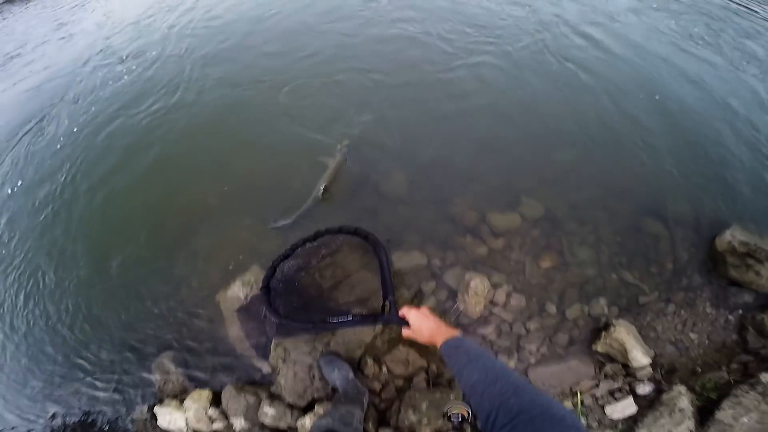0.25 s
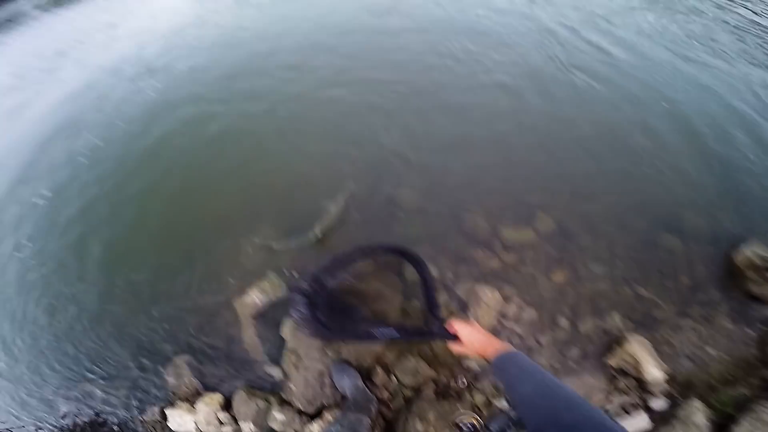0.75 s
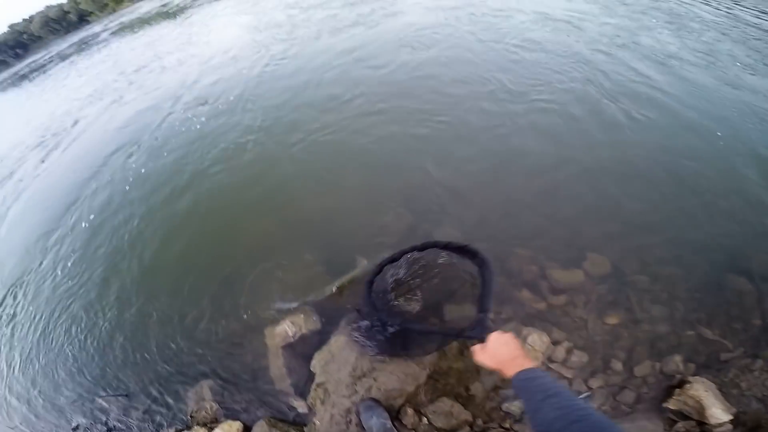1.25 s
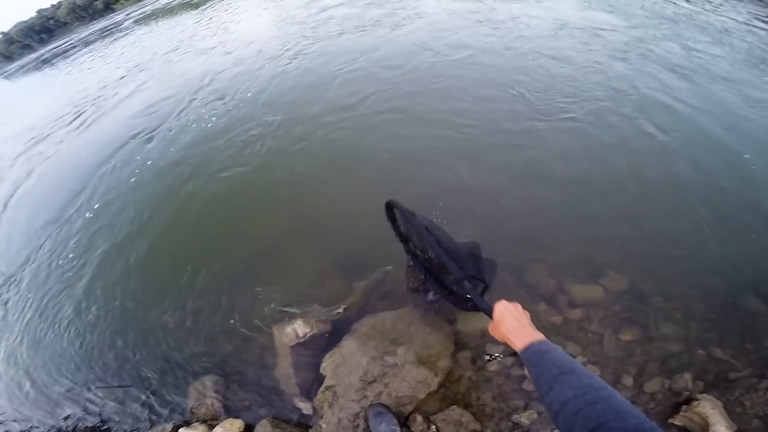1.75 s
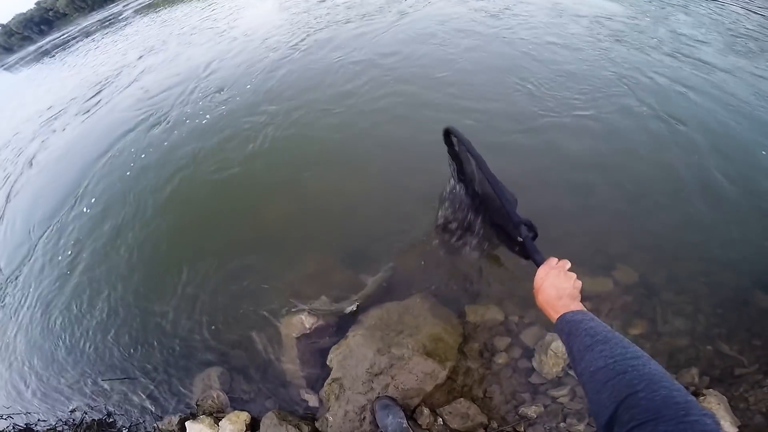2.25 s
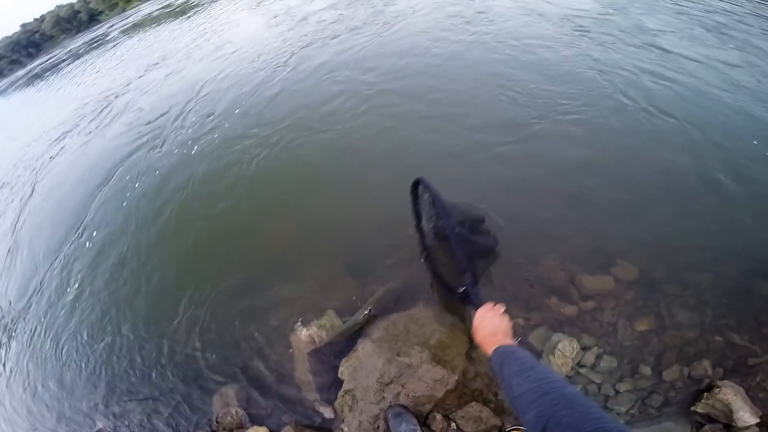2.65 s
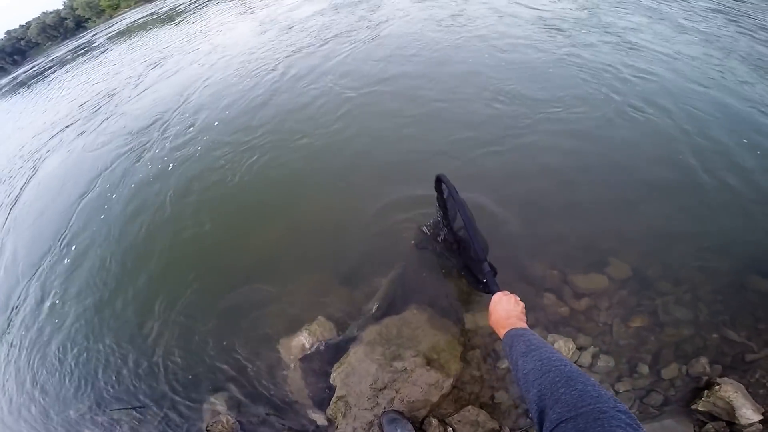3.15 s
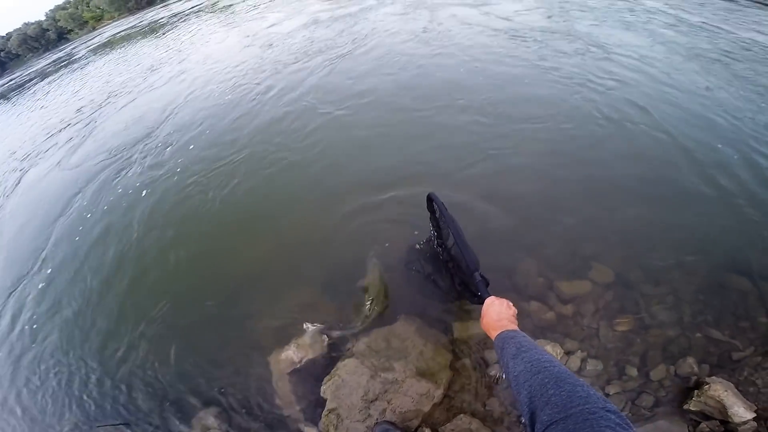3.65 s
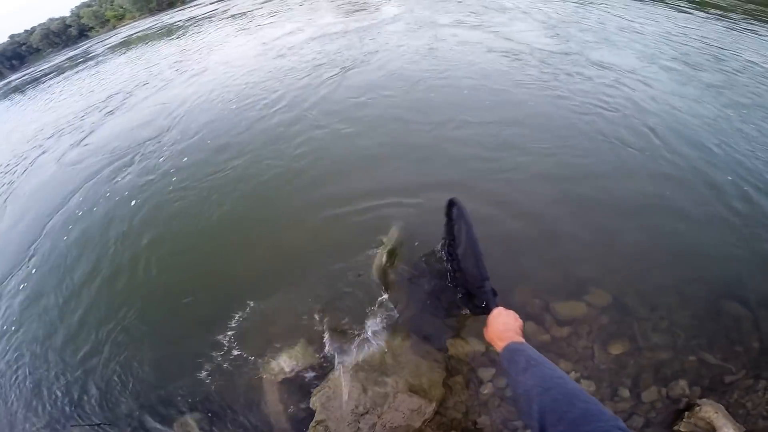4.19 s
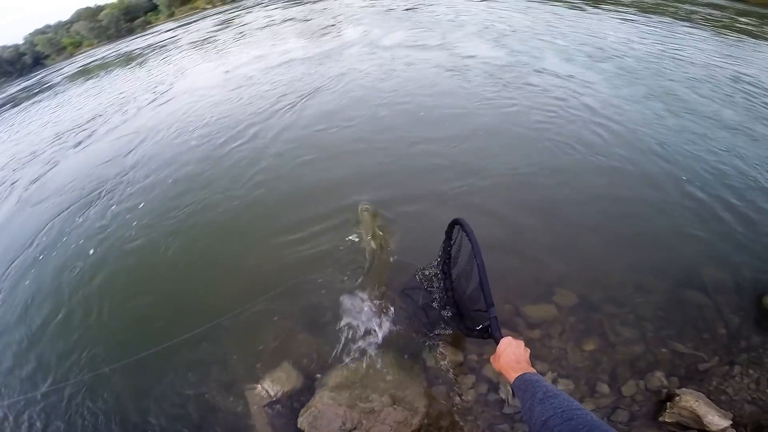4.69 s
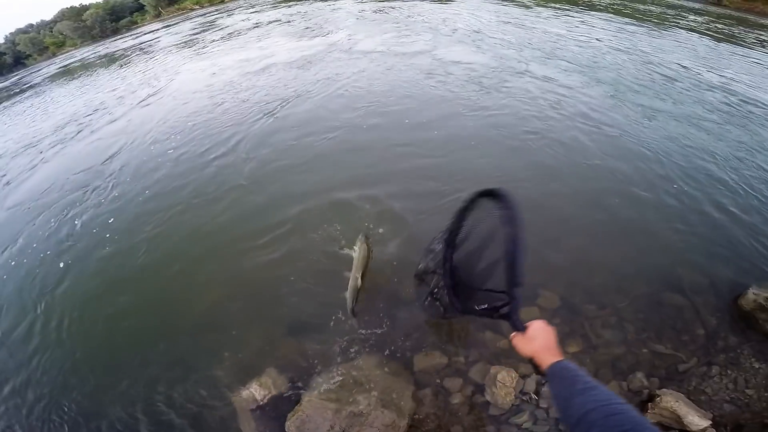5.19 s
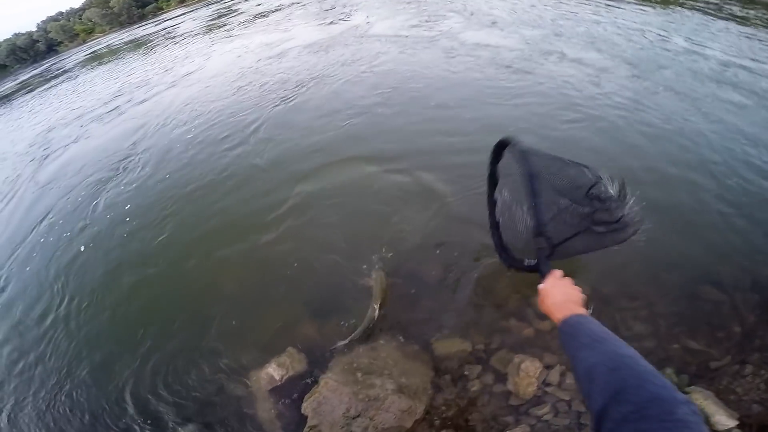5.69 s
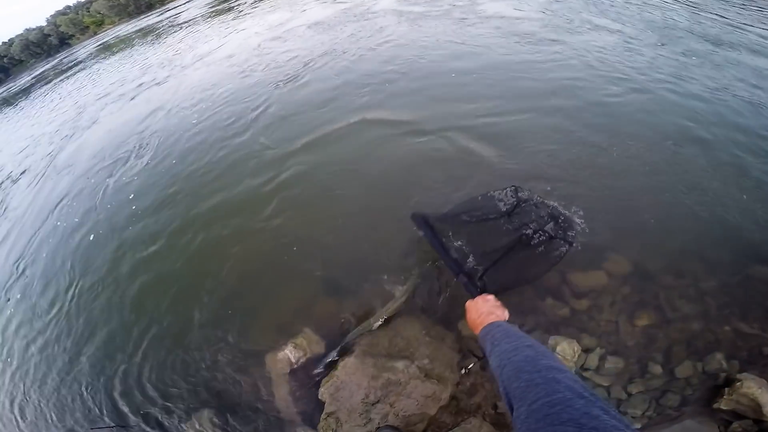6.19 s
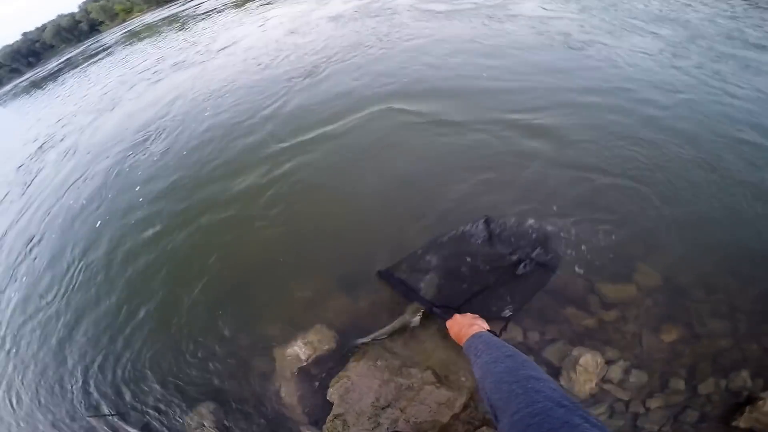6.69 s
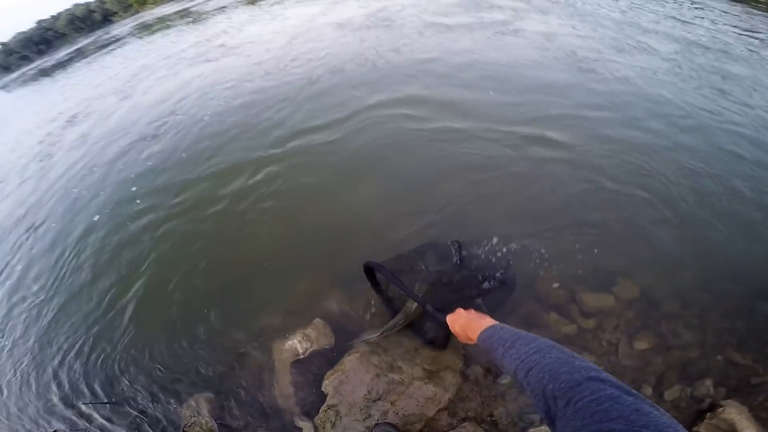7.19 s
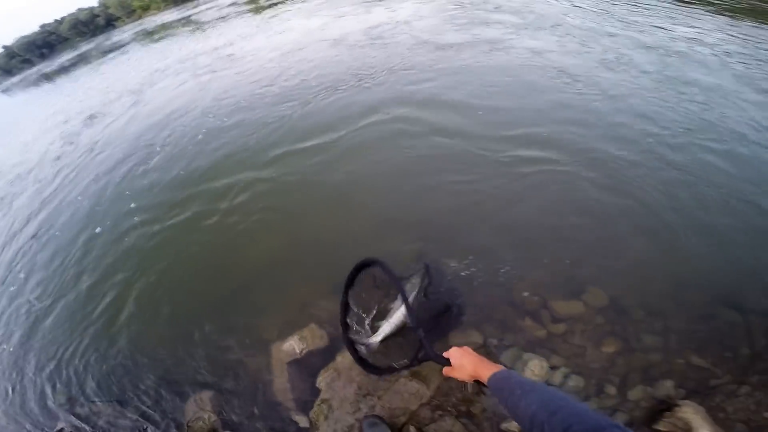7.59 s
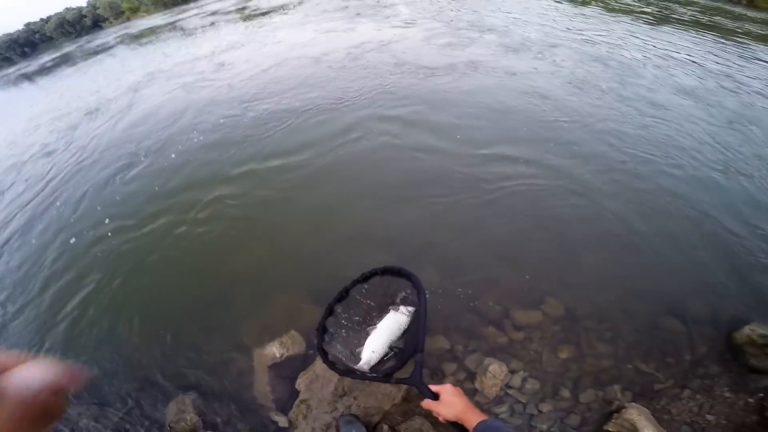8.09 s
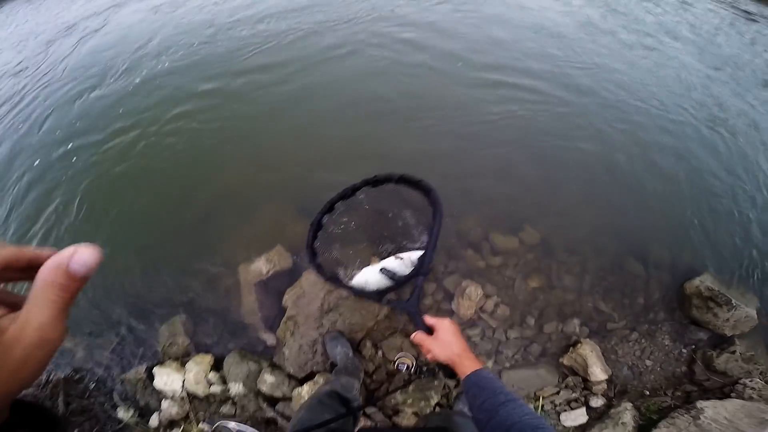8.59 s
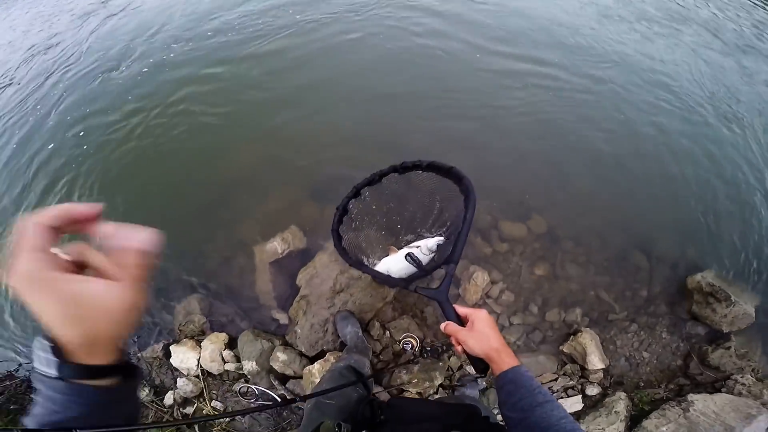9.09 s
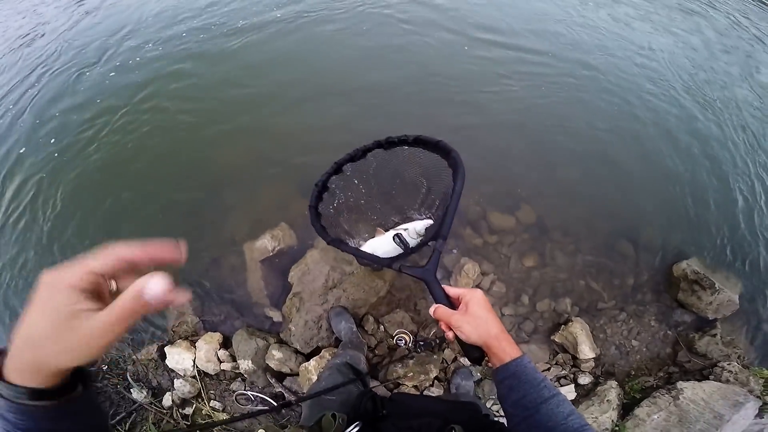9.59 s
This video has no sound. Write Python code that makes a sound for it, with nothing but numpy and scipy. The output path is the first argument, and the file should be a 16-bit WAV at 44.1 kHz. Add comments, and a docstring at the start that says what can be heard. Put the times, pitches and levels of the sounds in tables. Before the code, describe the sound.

On a quiet river bank, low wind rumbles on a head-worn camera microphone over a soft wash of current. A stone knocks with a dull thud, small pebbles tick and water sloshes gently. A fish then thrashes in bright, gulping splashes. After a pause the net makes a smaller splash, sweeps softly through the water and lifts, dripping sparsely while a distant bird whistles.

```python
"""On a river bank an angler nets a small fish from the stones, heard from a camera on the head.
A knock on the stones, the fish thrashes in the shallows, the net sweeps the water and is lifted, dripping.
Water sounds are built from ringing bubbles and shaped noise, stones from noise through resonances.
Air rumbles on the microphone and the river washes by as shaped noise; a songbird's gliding tones come from far off.
"""
import sys
import numpy as np
from scipy import signal
from scipy.fft import rfft, irfft
from scipy.io import wavfile
from scipy.ndimage import uniform_filter1d

SR = 44100
rng = np.random.default_rng(int(sys.argv[2]) if len(sys.argv) > 2 else 0)


def master_out(mix):
    """Clip the mix to full scale and print it as 16-bit PCM to the path in sys.argv[1]."""
    frames = np.transpose(np.atleast_2d(mix))
    ceiling = np.clip(frames, -1, 1)
    pcm = np.round(ceiling * 32767).astype(np.int16)
    wavfile.write(sys.argv[1], SR, pcm)


N = 434385
TIME = np.arange(N) / SR


def gain_of(db):
    """Logarithmic level: decibels to amplitude ratio."""
    return 10 ** (np.asarray(db) / 20)


def evened(x):
    """Normalisation: scales to unit rms."""
    return x / np.sqrt(np.mean(x ** 2) + 1e-20)


def add(mix, s, sound):
    """Superposition: mixes a sound in at time s, in place."""
    part = mix[max(round(s * SR), 0):][:len(sound)]
    part += sound[:len(part)]


def coloured(x, points):
    """Spectral shaping: filters x through (f/Hz, level/dB) points, then scales to unit rms."""
    hz, db = np.transpose(points)
    f = np.fft.rfftfreq(len(x), 1 / SR)
    gain = gain_of(np.interp(np.log(f + 1), np.log(hz + 1), db))
    return evened(irfft(rfft(x) * gain, len(x)))


def wander(size):
    """Low-pass noise: a random curve of unit rms, changing over about size samples."""
    smooth = uniform_filter1d(rng.standard_normal(N), size)
    return evened(uniform_filter1d(smooth, size))


def dying(t, rise, t60):
    """Damping: a soft start and an exponential decay, peaking at one."""
    shape = (1 - np.exp(-(t / rise) ** 2)) * gain_of(-60 * t / max(t60, .005))
    return shape / shape.max()


def droplets(per_s, size_db, low_hz, high_hz, cycles=7, count=24):
    """Bubble resonance: a random shower of short rings, each rising slightly in pitch, at unit rms."""
    out = np.zeros(N)
    for hz in np.geomspace(low_hz, high_hz, count):
        turns = np.arange(int(3 * cycles * SR / hz) + 2) * hz / SR
        tone = np.sin(2 * np.pi * turns * (1 + 0.032 * turns / cycles))
        ring = tone * np.exp(-2 * turns / cycles) * np.sqrt(hz)
        at = np.flatnonzero(rng.random(N) < per_s / count / SR)
        sizes = gain_of(size_db * np.minimum(rng.exponential(1, 8000), 4))
        rings = np.resize(sizes, len(at))[:, None] * ring
        where = (at[:, None] + np.arange(len(ring))) % N
        out += np.bincount(where.ravel(), rings.ravel(), N)
    return evened(out)


def bursts(rows, spectrum, t60, level_db, swell, grain, crack, lag=0.0016):
    """Transient noise: each grainy burst swells, cracks and decays with its own spectral tilt."""
    out, t = np.zeros(N), np.arange(-600, 3496) / SR
    swell_and_decay = np.exp(np.minimum(t, 0) / swell) * gain_of(-60 * np.maximum(t, 0) / t60)
    shape = swell_and_decay * (1 + crack * np.exp(-(t / 0.00054) ** 2))
    for s, db, brightness in rows:
        grains = rng.standard_normal(len(t)) * np.exp(grain * rng.standard_normal(len(t)))
        body = coloured(grains, [(hz, level + brightness * np.log2(hz)) for hz, level in spectrum])
        add(out, s + lag + t[0], gain_of(db + level_db) * body * shape)
    return out


def scattered(x, t60, wet_db):
    """Diffuse reflection: adds an echo of decaying noise, as from stones or trees."""
    t = np.arange(SR // 2) / SR
    tail = rng.standard_normal(len(t)) * dying(t, 0.0039, t60)
    return x + gain_of(wet_db) * signal.oaconvolve(x, tail / np.linalg.norm(tail))[:N]


# water thrown up, first by the fish's tail, then by the net:
# t/s, length/s, spray level/dB, churn level/dB, t60/s of the falling back
SURGES = [(3.805, 0.077, -66.5, -70, .5), (3.887, 0.12, -65, -71.5, 0.66), (4.113, 0.052, -61, -67.5, 0.34),
          (4.205, 0.061, -64.5, -61.5, 0.67), (4.283, 0.17, -59.5, -64.5, 0.54),
          (4.501, 0.051, -62.5, -65, .6), (4.572, 0.031, -56.5, -64.5, .7), (4.641, 0.074, -59, -71, 0.99),
          (4.785, 0.044, -63.5, -69, 0.83), (5.987, 0.042, -64, -70, .6), (6.015, 0.066, -62, -74, 0.45),
          (6.123, 0.018, -66.5, -70, 0.5), (6.21, 0.04, -68.5, -74, 0.78), (6.347, 0.06, -68, -69, 0.27),
          (6.427, .035, -71, -69.5, .6)]
# spectrum of the falling spray: f/Hz, level/dB per Hz
SPRAY = [(900, -2.5), (1800, -11), (2600, -5), (4000, 2.5), (5200, -5.5), (6500, -9.5), (8200, -4.5),
         (10500, -12), (14500, -7)]
# spectrum of the larger bubbles below: f/Hz, level/dB per Hz
CHURN = [(100, -25), (300, 2), (600, 10.5), (950, 12.5), (1600, 16), (2300, -5.5), (4000, -23)]
SURGE_RISE_S = 0.011  # half the rise, centred on the surge's listed time
TINKLE_SHARE, MIST_SHARE = .45, .21  # long rings and smooth noise, as amplitudes beside the drops


def splash(clump_db=2, fizz_db=-15):
    """Bubble acoustics: thrown water falls back as clumped spray and fizz over churning bubbles."""
    s, length, spray_db, churn_db, t60 = np.transpose(SURGES)[:, :, None]
    age = TIME - s
    rise = np.clip(.5 + .5 * age / SURGE_RISE_S, 0, 1)
    surge = rise * gain_of(-60 * np.clip(age - length, 0, 2) / t60)

    drops = droplets(2700, 3.2, 1300, 15000, cycles=10, count=40)
    tinkle = droplets(800, 2.3, 1900, 6000, cycles=24, count=40)
    gurgle = droplets(750, 3.3, 300, 2600, cycles=9, count=36)
    spray = coloured(drops + TINKLE_SHARE * tinkle + MIST_SHARE * rng.standard_normal(N), SPRAY)
    spray = spray + gain_of(fizz_db) * droplets(220, 7.5, 6900, 14000, cycles=2.5)
    churn = coloured(gurgle + MIST_SHARE * rng.standard_normal(N), CHURN)

    out = np.zeros(N)
    for water, db in [(spray, spray_db), (churn, churn_db)]:
        strongest = (surge * gain_of(db)).max(0)  # overlapping surges do not add up
        out += water * strongest * gain_of(clump_db * wander(size=300))
    return out


# slaps on the water and fine, bright pops of fizz:
# t/s, level/dB before the common trim, brightness/dB per octave
SLAPS_AND_POPS = [(3.806, -57.5, 8), (3.899, -52, 1.5), (3.926, -50.5, 6), (3.968, -51, 2),
                  (4.068, -55.5, 10), (4.128, -57, 3), (4.291, -48, -1), (4.322, -52, -2), (4.357, -56, -1),
                  (4.386, -54, 10), (4.433, -53.5, 3), (4.505, -66, -2), (4.601, -54, 4), (4.659, -59, -1),
                  (4.799, -56, 3), (6.033, -58, 12), (6.062, -58, -3), (6.128, -60, -1), (6.187, -63, 11),
                  (6.212, -49, -7.5), (6.213, -60, 13), (6.279, -51, -2.5), (6.31, -59.5, 1.5),
                  (6.365, -57, 4), (6.407, -70, 9), (6.455, -60, 2), (6.476, -60, 11), (6.553, -62, 2)]
# spectrum of a slap or pop before its tilt, also of a heavy drop: f/Hz, level/dB per Hz
SURFACE_BURST = [(300, 4), (900, 5), (2000, 2), (3500, 2), (6000, -3.5), (10000, -11.5), (15000, -18)]


def slaps_and_pops():
    """Transient noise: slaps on the water and fine, bright pops of fizz, as short bursts of noise."""
    return bursts(SLAPS_AND_POPS, SURFACE_BURST, t60=0.025, level_db=1.0,
                  swell=0.0015, grain=0.37, crack=0.076)


SPATTER_PER_S, SPATTER_DB = 30, -12  # heavy drops in a surge, mean dB over its spray


def spatter(spread_db=4, tilt_db=2):
    """Random impacts: heavy drops land as soft bursts at chance moments within each surge."""
    rows = []
    for start, length, spray_db, _, _ in SURGES:
        for when, force, colour in rng.random((round(SPATTER_PER_S * length), 3)):
            db = spray_db + spread_db * (2 * force - 1)
            rows.append((start + when * length, db, tilt_db * (2 * colour - 1)))
    return bursts(rows, SURFACE_BURST, t60=0.045, level_db=SPATTER_DB, swell=0.0032, grain=0.27, crack=0.1)


RING_T60, RING_HZ, RING_DB = 0.073, 1000, -53.5  # s that a bubble of this pitch and level rings
RING_PITCH_POWER, RING_HALVING_DB = 1, 15


def ring_time(hz, db):
    """Bubble damping: large, gently trapped bubbles ring longest."""
    return RING_T60 * (RING_HZ / hz) ** RING_PITCH_POWER * 2 ** ((RING_DB - db) / RING_HALVING_DB)


def bubble(hz, t60, glide, onset_cycles=0.83, wobble=0.044, swell_share=0.042):
    """Volume resonance: a trapped air pocket rings, its pitch bending as it nears the surface."""
    t = np.arange(5000) / SR
    unrest = evened(uniform_filter1d(rng.standard_normal(len(t)), 90))
    octaves = np.clip(glide * t, -2, 2)
    pitch = hz * 2 ** octaves * (1 + wobble * unrest)
    alive = np.exp(-(octaves / 1.45) ** 8)  # silenced once bent by about 1.45 octaves
    swell = swell_share * min(t60, RING_T60) * np.tanh(max(glide, 0) / 10)  # rising gulps open softly
    envelope = dying(t, onset_cycles / hz + swell, t60) * alive
    return np.sin(2 * np.pi * np.cumsum(pitch) / SR) * envelope


# large air pockets closing in the water:
# t/s, level/dB (before the common trim), f/Hz, glide/octaves per s
BUBBLES = [(2.771, -58, 846, 18), (2.812, -56, 840, 5), (2.829, -58, 1050, 36), (3.633, -56, 1600, -3),
           (3.645, -52, 1480, -21), (3.674, -64, 717, -1), (3.759, -54, 1480, 0), (3.761, -56, 903, 16),
           (3.813, -55, 1260, 31), (3.831, -59, 1000, 9), (3.84, -58, 1450, 17), (3.869, -59, 924, 9),
           (3.873, -60, 1600, -5), (3.882, -53, 1006, -1), (3.884, -49, 1330, -4), (3.898, -39, 3100, -5),
           (3.901, -62, 1280, 12), (3.921, -50, 1620, 2), (3.972, -42.5, 1180, -19),
           (3.992, -55, 900, -6.5), (4.051, -48.5, 844, -2.5), (4.104, -65, 655, 6), (4.112, -67, 1060, 8),
           (4.126, -59, 813, -5), (4.142, -46.5, 997, 0), (4.16, -54, 2450, -6), (4.163, -57, 720, -12.5),
           (4.173, -54, 450, -2.5), (4.212, -37.5, 158, 41.5), (4.238, -56, 904, 11),
           (4.281, -47, 1145, -14), (4.303, -55, 1046, 14), (4.314, -56, 782, 18.5), (4.336, -55, 386, 6.5),
           (4.385, -54, 323, -1), (4.362, -54, 2300, 3), (4.418, -52, 977, -11), (4.434, -43.5, 940, -9),
           (4.505, -51, 2244, 9), (4.52, -49, 1510, -25), (4.536, -37, 1014, -17), (4.541, -48, 1580, 2),
           (4.727, -55, 464, -0.5), (4.784, -60, 930, -8.5), (4.849, -57, 1600, 4), (4.93, -54.5, 281, 4),
           (4.932, -60.5, 647, 19.5), (4.97, -55, 868, 17), (5.036, -58, 817, 23), (5.067, -56, 987, -10),
           (5.069, -63, 1350, 0), (6.032, -60, 1240, 5), (6.064, -71, 884, 5), (6.081, -60, 1250, -2),
           (6.083, -45, 2600, -2), (6.132, -59, 1110, -8), (6.28, -57, 1194, -16), (6.315, -57, 224.5, -3),
           (6.35, -56, 2310, -1), (6.372, -62, 1010, 14), (6.384, -53, 2900, 10), (6.386, -56, 1500, 12),
           (6.392, -54, 1510, -6), (6.397, -65, 817, 5), (6.437, -60, 700, 15), (6.507, -57, 1516, -9),
           (7.51, -56, 1550, 2), (8.331, -56.5, 927, 6), (9.069, -56.5, 990, 0.5)]
STRAY_PER_S, STRAY_LAG_S = 49, .05  # lesser bubbles in a surge and just after it
STRAY_DB, STRAY_LOW_HZ, STRAY_HIGH_HZ = 4.5, 709, 2354  # loudest stray, dB over the surge's churn


def plops(level_db=-1, stray_rise=9, spread_db=3):
    """Bubble resonance: gulps around fish and net, and lesser bubbles stirred up by every surge."""
    out = np.zeros(N)
    for s, db, hz, glide in BUBBLES:
        add(out, s, gain_of(db + level_db) * bubble(hz, ring_time(hz, db), glide))
    for start, length, _, churn_db, _ in SURGES:
        span = length + STRAY_LAG_S
        for when, size, force, bend in rng.random((round(STRAY_PER_S * span), 4)):
            hz = STRAY_LOW_HZ * (STRAY_HIGH_HZ / STRAY_LOW_HZ) ** size
            db = churn_db + STRAY_DB - 2 * spread_db * force
            stray = bubble(hz, ring_time(hz, RING_DB), 2 * bend * stray_rise)
            add(out, start + when * span, gain_of(db) * stray)
    return out


# drips from the mesh and the fish's tail: t/s, level/dB at the peak, f/Hz
DRIPS = [(1.352, -59, 4020), (1.46, -61, 3880), (1.558, -65, 4380), (1.722, -61, 2350),
         (2.378, -55.5, 3800), (2.8095, -56, 2560), (3.612, -54.5, 5220), (3.679, -51, 4080),
         (3.927, -42.5, 3820), (3.998, -48, 3900), (4.292, -43, 4250), (4.572, -48.5, 3540),
         (6.083, -53, 4050), (6.128, -52, 3650), (6.223, -50, 4050), (6.239, -61, 3930), (6.398, -55, 4200),
         (6.8518, -58, 4740), (7.4939, -49.5, 4200), (7.5318, -55.5, 3700), (7.5762, -55, 3820),
         (7.5981, -54.5, 3930), (7.841, -58, 4270), (7.915, -62, 3950), (8.2962, -55, 4050),
         (9.122, -59, 4100), (9.335, -59, 4050), (9.682, -57.5, 4020)]
DRAIN_DB, DRAIN_HZ = -72, 4100  # mean of the faint drips while the lifted net drains


def drips(t60=0.019, spread_db=2, spread_hz=300, count=5):
    """Bubble resonance: small falling drops each set off a short, high ring."""
    out = np.zeros(N)
    times = rng.uniform(7.2, 9.8, count)  # s, while the net drains
    levels = rng.normal(DRAIN_DB, spread_db, count)
    pitches = rng.normal(DRAIN_HZ, spread_hz, count)
    for s, db, hz in [*DRIPS, *zip(times, levels, pitches)]:
        add(out, s, gain_of(db) * bubble(hz, t60, 0.87, onset_cycles=1.0, wobble=0.037))
    return out


# the net stirs the shallows gently: middle t/s, half length/s, level/dB
STIRS = [(2.675, 0.39, -67.5), (7.148, 0.63, -68)]
# spectrum of the stirred water: f/Hz, level/dB per Hz
SLOSH = [(120, -4), (280, 6), (500, -7.5), (950, -2), (1500, -8), (2500, -9.5), (5000, -18)]


def stir(bubbly=0.49):
    """Flow noise: water washes softly through the moving mesh, as noise mixed with small rings."""
    bubbles = droplets(200, 3.2, 296.0, 1785, cycles=6.4)
    water = coloured(rng.standard_normal(N) + bubbly * bubbles, SLOSH)
    return water * sum(gain_of(db) * np.exp(-((TIME - s) / half) ** 2) for s, half, db in STIRS)


# a stone tips and lands: t/s, clack level/dB, thud level/dB, t60/s
KNOCKS = [(2.4654, -47.5, -50, 0.045), (2.472, -48.5, -59, 0.022), (2.4878, -52, -42.5, 0.033),
          (2.497, -56, -48, 0.047), (2.515, -62, -60, 0.069), (2.549, -64, -57, .05)]
# resonances of the stone: f/Hz, width/Hz, level/dB
STONE = [(930, 220, -5), (2340, 210, -6), (3100, 210, 3), (3400, 270, 3), (4200, 210, 0), (5330, 310, -10),
         (6740, 460, -7), (7300, 340, -9)]
# spectrum of its weight landing: f/Hz, level/dB per Hz
THUD = [(80, -15), (170, -7), (300, 10), (600, -4.5), (1000, -2), (1600, -9), (2500, -50), (6000, -46)]


def knock(grit_db=-10):
    """Modal excitation: gritty contacts ring the stone; its weight landing adds a thud."""
    out, t = np.zeros(N), np.arange(6000) / SR
    f = np.geomspace(150, 15000, 500)
    modes = sum(gain_of(db) / np.hypot(1, 2 * (f - hz) / width) ** 2 for hz, width, db in STONE)
    response = modes + gain_of(grit_db) / np.hypot(1, f / 6000)
    for s, clack_db, thud_db, t60 in KNOCKS:
        clack = coloured(rng.standard_normal(len(t)), np.c_[f, 20 * np.log10(response)])
        thud = coloured(rng.standard_normal(len(t)), THUD)
        contact = gain_of(clack_db) * clack + gain_of(thud_db) * thud
        add(out, s, contact * dying(t, 0.00095, t60))
    return out


# gritty ticks of stones and tackle: t/s, level/dB before the common trim, brightness/dB per octave
TICKS = [(2.691, -62, 1), (2.882, -55, 2), (2.892, -57.5, -8), (2.946, -56.5, 0), (3.179, -61, 1),
         (3.4878, -52.5, 7), (3.526, -54.5, 6), (8.225, -61.5, 5)]
# spectrum of a tick: f/Hz, level/dB per Hz
TICK = [(300, -16), (1000, 2), (2500, 8), (5300, 4), (7500, -0.5), (10000, -6.5), (15000, -3)]


def ticks():
    """Contact noise: stones and tackle touch in short, rough bursts."""
    return bursts(TICKS, TICK, t60=0.032, level_db=1.0, swell=0.0021, grain=0.72, crack=0.32)


# pebbles that ring when nudged: t/s, level/dB, f/Hz
CLINKS = [(2.691, -59.5, 5270), (2.881, -55, 6500), (2.884, -57, 5450), (2.946, -64, 5100),
          (2.969, -67, 5050)]


def clinks(t60=0.036):
    """Damped resonance: nudged pebbles ring briefly, as narrow bands of noise."""
    out, t = np.zeros(N), np.arange(4000) / SR
    for s, db, hz in CLINKS:
        band = [(hz / 1.25, -50), (hz / 1.03, 0), (hz * 1.03, 0), (hz * 1.25, -50)]
        ring = coloured(rng.standard_normal(len(t)), band)
        add(out, s, gain_of(db) * ring * dying(t, 0.0008, t60))
    return out


# whistled bird notes: t/s, length/s, level/dB before the echo, start f/Hz, early f/Hz, late f/Hz, end f/Hz
BIRD = [(0.023, 0.095, -70.5, 3430, 3540, 3580, 3480), (0.025, 0.11, -76, 3580, 3750, 3780, 3730),
        (0.296, 0.063, -68.5, 2860, 3100, 3220, 3260), (0.467, 0.11, -67.5, 3630, 3510, 3560, 3460),
        (1.129, 0.098, -71.5, 3480, 3530, 3710, 3680), (1.454, 0.046, -73, 3080, 3100, 3080, 3060),
        (1.575, 0.041, -73, 2880, 2900, 2950, 2960), (1.775, .05, -77, 2540, 2570, 2610, 2620),
        (1.838, .045, -73, 2940, 2910, 2870, 2850), (2.071, 0.049, -69.5, 2970, 3130, 3420, 3370),
        (2.204, 0.059, -67, 4100, 3850, 3490, 3580), (2.32, 0.041, -73, 3000, 3050, 3090, 3040),
        (2.428, 0.035, -70, 3030, 3040, 2950, 2980), (2.602, 0.068, -70.5, 3760, 3640, 3550, 3470),
        (3.599, 0.052, -65, 3590, 3540, 3480, 3480), (5.075, 0.044, -73, 3450, 3470, 3420, 3500),
        (5.098, 0.041, -73, 4070, 4020, 3970, 3950), (6.979, 0.056, -67, 3970, 4030, 4020, 3940),
        (7.186, 0.042, -71, 3270, 3100, 2830, 2550), (7.595, .06, -71, 2630, 2720, 2790, 2790),
        (7.726, 0.051, -65.5, 3360, 3440, 3450, 3520), (8.003, 0.052, -71.5, 2500, 2420, 2400, 2430),
        (8.221, 0.064, -62, 3110, 3600, 3750, 3050), (8.373, 0.051, -73, 2890, 3070, 3020, 3060),
        (8.63, 0.044, -70, 3320, 3250, 2860, 2350), (8.8, 0.1, -69.5, 2440, 2940, 3220, 3280),
        (9.011, 0.08, -60, 3780, 3360, 3510, 3430), (9.25, 0.038, -67.5, 4100, 4000, 3650, 3520)]


def bird(waver=0.0088):
    """Frequency modulation: short whistled tones, each bending smoothly through four pitches."""
    out, unrest = np.zeros(N), wander(size=120)
    for s, length, db, *pitches in BIRD:
        u = np.linspace(0, 1, int(length * SR))
        contour = np.polyfit(np.linspace(0, 1, len(pitches)), pitches, len(pitches) - 1)
        hz = np.polyval(contour, u) * (1 + waver * unrest[int(s * SR):][:len(u)])
        whistle = np.sin(2 * np.pi * np.cumsum(hz) / SR)
        add(out, s, gain_of(db) * whistle * signal.windows.tukey(len(u), 1 / 3))
    return out


def far_bank(x):
    """Multiple scattering: trees along the river smear a distant note and give it a trailing echo."""
    near_trees = scattered(x, t60=0.22, wet_db=-8)
    return scattered(near_trees, t60=0.8, wet_db=-8)


# spectrum of the current: f/Hz, level/dB per Hz
RIVER = [(65, -5), (110, 1.5), (221, -5.5), (348, -10.5), (410, -12), (645, -16), (760, -19), (973, -20),
         (1380, -20.5), (2170, -24.5), (2510, -23.5), (3630, -24.5), (4740, -28), (5150, -27.5),
         (15000, -31.5)]
RIVER_DB = -61


def river(flicker_db=0.9, trickle_db=-77):
    """Turbulence noise: the wide wash of the current, with tiny ripples breaking on the stones."""
    wash = coloured(rng.standard_normal(N), RIVER) * gain_of(RIVER_DB + flicker_db * wander(size=1500))
    ripples = droplets(700, 1.8, 900, 5500, cycles=16)
    return wash + gain_of(trickle_db) * coloured(ripples, SPRAY)


# strength of the air on the microphone, before low-pass and flutter: t/s, level/dB
WIND = [(0.0, -23), (0.03, -31), (0.25, -35), (0.85, -30.5), (1.0, -30.5), (1.43, -30), (1.6, -31),
        (1.89, -22.5), (2.06, -32.7), (2.61, -29.5), (2.77, -26.5), (3.34, -36), (3.83, -34), (4.03, -26),
        (4.25, -40.5), (4.43, -29), (4.68, -44), (4.85, -30.5), (5.25, -34), (6.51, -30), (6.68, -21),
        (6.82, -28.5), (7.11, -26), (8.31, -36.5), (8.42, -30.5), (8.85, -30), (8.99, -36.5), (9.85, -39.5)]
# spectrum of the eddies: f/Hz, level/dB per Hz
RUMBLE = [(8, -65), (18, -7), (26, 2.5), (35, -4.5), (44, -7), (55, -23.5), (70, -28.5), (100, -43),
          (200, -40.5)]
LULL_SHARE = .4  # eddies weaker than this, against their rms, leave a lull
FLUTTER_DB = 2  # limit of the quick unevenness within the gusts


def wind(top_hz=95):
    """Pressure fluctuation: eddies push on the microphone, each gust at a fairly even strength."""
    eddies = coloured(rng.standard_normal(N), RUMBLE)
    power = abs(signal.hilbert(eddies)) ** 2
    strength = np.sqrt(uniform_filter1d(uniform_filter1d(power, size=2000), size=1600))
    level = gain_of(np.interp(TIME, *np.transpose(WIND)))
    gusts = evened(eddies / np.hypot(strength, LULL_SHARE)) * level
    low = signal.sosfiltfilt(signal.butter(2, top_hz, fs=SR, output="sos"), gusts)
    return low * gain_of(FLUTTER_DB * np.tanh(wander(size=2500)))


# spectrum of the steady air under the gusts: f/Hz, level/dB per Hz
BREEZE = [(30, -8), (60, 8), (85, 0), (120, -11), (200, -32.5), (400, -69)]
BREEZE_DB = -57.5


def breeze():
    """Stationary noise: steady low air under the gusts."""
    return gain_of(BREEZE_DB) * coloured(rng.standard_normal(N), BREEZE)


def scene():
    """Superposition: near water and stones, the far bird, the river and the air."""
    water = splash() + slaps_and_pops() + spatter() + plops() + drips() + stir()
    stones = knock() + ticks() + clinks()
    near = scattered(water + stones, t60=0.076, wet_db=-15.5)
    return (near + far_bank(bird()) + river() + wind() + breeze())[None]


# resonances of the camera housing: f/Hz, width/Hz, level/dB
HOUSING = [(950, 316, 6.5), (2460, 1290, 4), (3060, 61, 4.5), (3545, 1160, 5.5), (4100, 960, -2),
           (5130, 1460, 4.5), (7400, 180, 1.5)]
# dips and slight peaks in the housing's colour: f/Hz, width/Hz, level/dB
DIPS_AND_PEAKS = [(1920, 52, -3.5), (2760, 150, -7), (3165, 200, -22), (4380, 81, -0.5), (6720, 450, 1.5)]
EDGE_HZ = 15300


def record(dry):
    """Linear filtering: the housing's peaks and dips colour everything; a low-pass limits the band."""
    f = np.fft.rfftfreq(N, 1 / SR)
    colour = 1
    for hz, width, db in HOUSING + DIPS_AND_PEAKS:
        resonance = 1j * f * width / (hz ** 2 - f ** 2 + 1j * f * width)
        colour = colour + (gain_of(db) - 1) * resonance
    heard = irfft(rfft(dry) * colour, N)
    low_pass = signal.firwin(401, EDGE_HZ, window=("kaiser", 9), fs=SR)
    return signal.oaconvolve(heard, low_pass[None], "same")


dry = scene()
out = record(dry)
master_out(out)
```